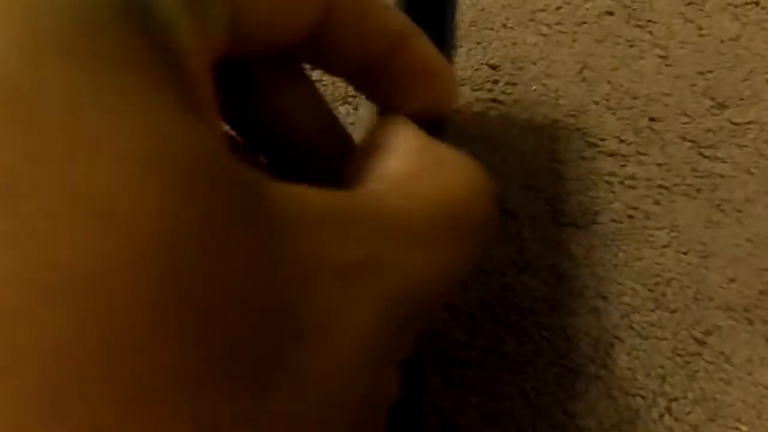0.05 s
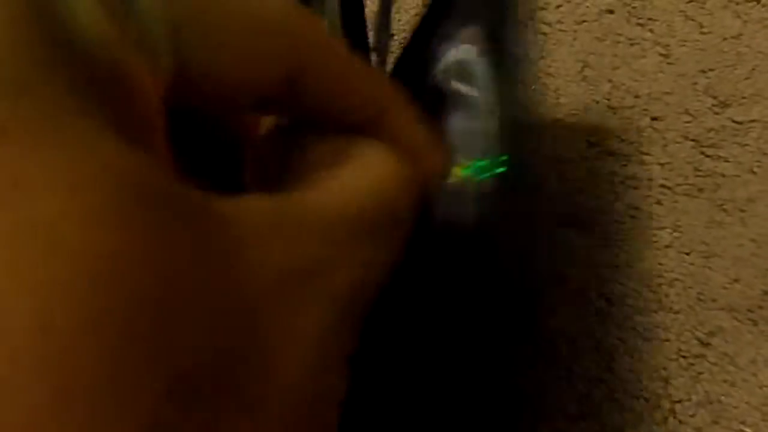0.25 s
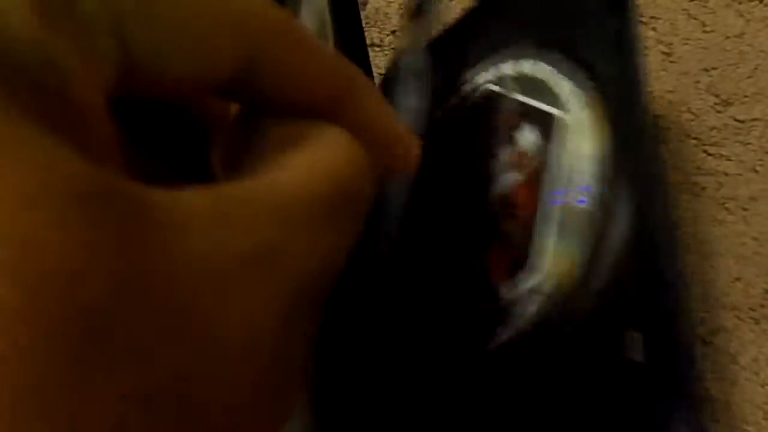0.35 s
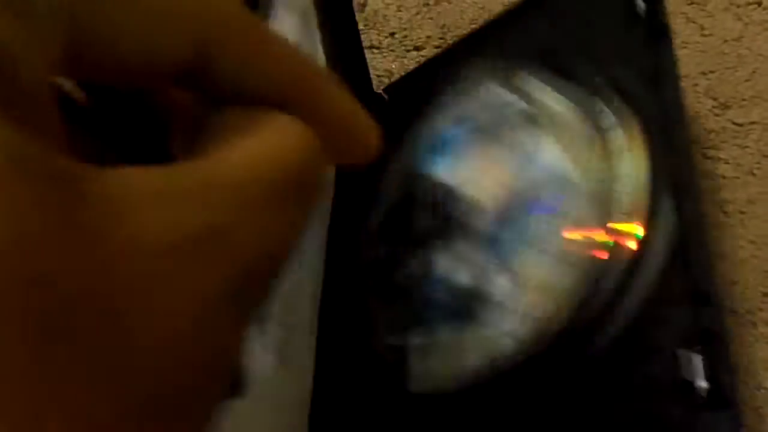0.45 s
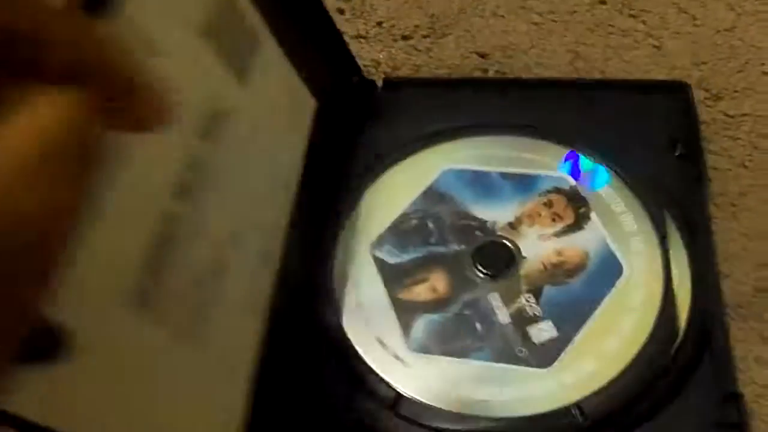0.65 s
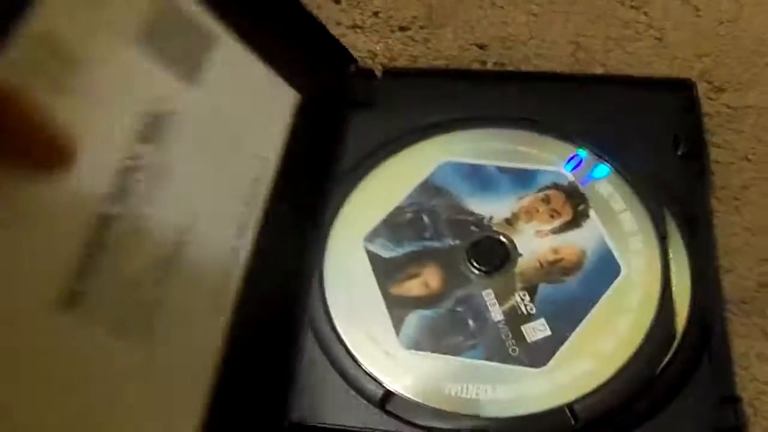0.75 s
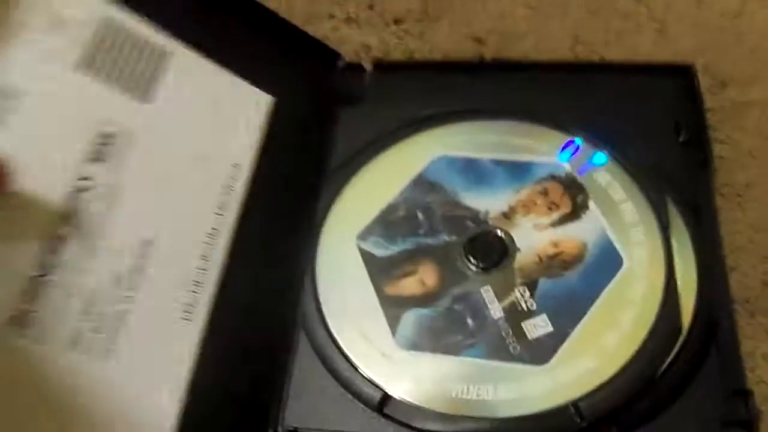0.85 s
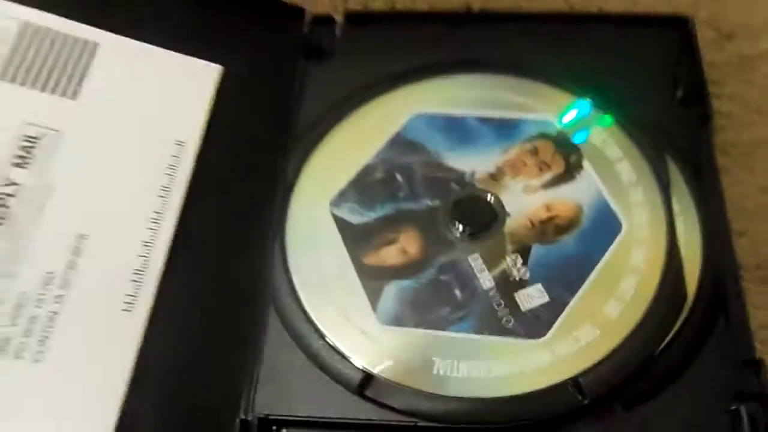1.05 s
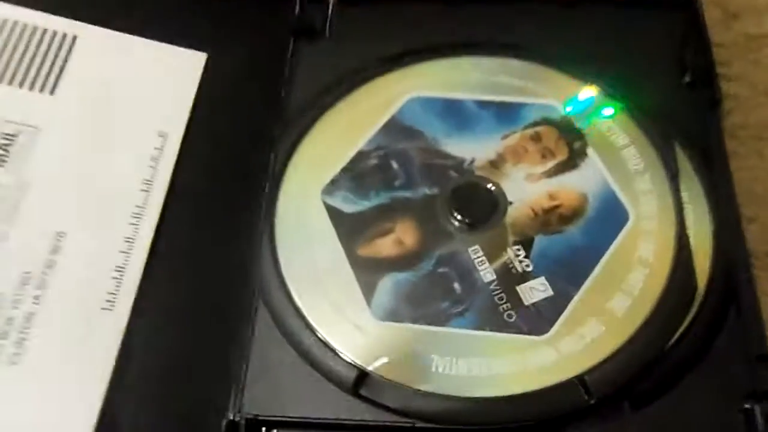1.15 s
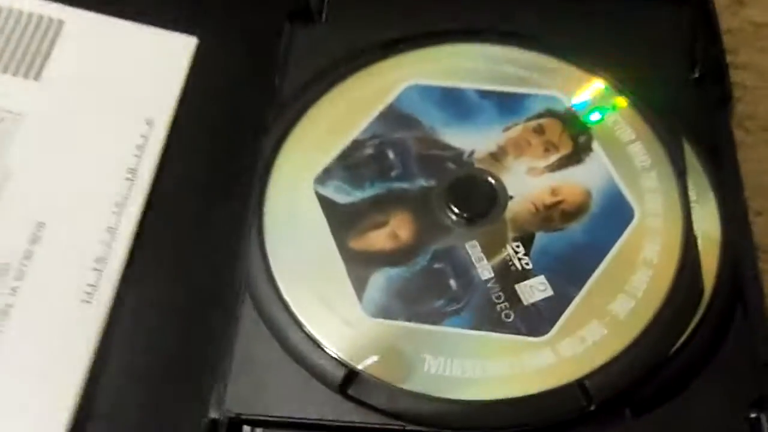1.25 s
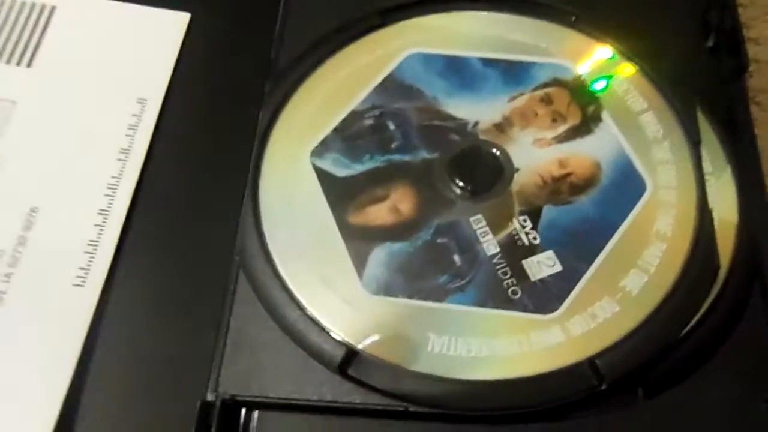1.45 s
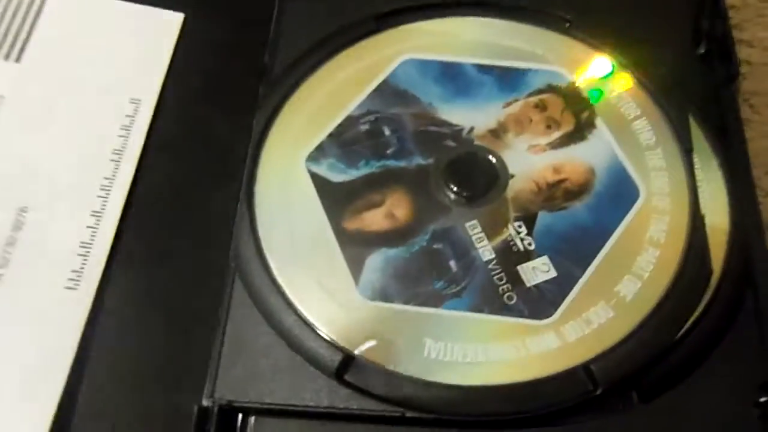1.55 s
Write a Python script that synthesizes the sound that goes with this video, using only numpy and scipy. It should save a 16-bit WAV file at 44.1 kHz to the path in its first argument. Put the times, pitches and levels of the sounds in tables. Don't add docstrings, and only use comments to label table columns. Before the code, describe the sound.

A plastic disc case snaps open close to a small microphone in a quiet carpeted room: two hard clicks in quick succession, a lighter tray slap with small bounces, faint settling ticks, then very soft paper crackle.

```python
import sys
import numpy as np
from scipy import signal
from scipy.fft import rfft, irfft
from scipy.io import wavfile
from scipy.ndimage import uniform_filter1d

SR = 44100
rng = np.random.default_rng(int(sys.argv[2]) if len(sys.argv) > 2 else 0)


def decibels_to_gain(level_db):
    exponent = np.asarray(level_db, float) / 20
    return 10 ** exponent


def transcribe(u):
    v = np.clip(np.atleast_2d(u).T, -1, 1)
    q = np.round(v * 32767).astype(np.int16)
    wavfile.write(sys.argv[1], SR, q)


N = 70560

# mode_hz, width_hz, level_db
LID_BODY = [(1037, 61.1, -11), (2170, 55, -12.5), (2720, 100, -14.5), (2890, 38.4, -6), (4000, 61, -6),
            (4670, 42, -10), (7160, 25, -4.5), (8900, 133, -10.5), (11110, 36, -16), (12000, 47, -20)]
# mode_hz, width_hz, level_db
SLEEVE_BODY = [(2050, 150, -5), (2900, 200, -8), (3450, 100, -7), (4350, 80, -4), (5400, 100, -8),
               (8000, 200, -10), (10000, 220, -10), (12800, 300, -12)]
# frequency_hz, density_db (per Hz)
TRAY_TONE = [(100, -34.5), (300, -23), (700, -24), (1300, -22.5), (2200, -12), (8000, -6.5), (13500, -15),
             (17000, -11)]
# frequency_hz, density_db (per Hz)
LID_TONE = [(180, -46), (300, -10.5), (1030, -12.5), (1300, -12.5), (2130, -8.5), (3870, -8.5),
            (14000, -29.5)]


def evened(x):
    return x / np.sqrt(np.mean(x ** 2) + 1e-20)


def read(points, hz):
    f, value = np.transpose(points)
    return np.interp(np.log(hz + 1), np.log(f + 1), value)


def curve(points):
    s, db = np.transpose(points)
    return decibels_to_gain(np.interp(np.arange(N) / SR, s, db))


def ring(x, hz, width):
    radius = np.exp(-np.pi * max(width, 20) / SR)
    pole = radius * np.exp(2j * np.pi * hz / SR)
    return 2 * signal.lfilter([1 - radius], [1, -pole], x).real


def colour(x, tone, tilt_db=0.):
    hz = np.abs(np.fft.fftfreq(2048, 1 / SR))
    octaves = np.log2(np.maximum(hz, 2000) / 4500)
    level_db = np.maximum(read(tone, hz) + tilt_db * octaves, -100)
    log_gain = np.log(decibels_to_gain(level_db))
    taps = np.fft.ifft(np.exp(np.conj(signal.hilbert(log_gain)))).real[:1024]
    return signal.fftconvolve(x, taps)[:len(x)]


def body(x, modes, tone, tilt_db, plain_db, shift=1):
    widen_hz = 120
    shifts = shift * np.ones(14)
    rung = 0
    for (hz, width, db), k in zip(modes, shifts):
        rung = rung + decibels_to_gain(db - read(tone, hz)) * ring(x, hz * k, width + widen_hz)
    return colour(evened(rung) + decibels_to_gain(plain_db) * evened(x), tone, tilt_db)


def knocks(rows, modes, tone, plain_db, ring_db):
    length, rise_s = 4096, .0006
    crack_s, crack_db = .002, 4.5
    shake_db, detune = 1, .015
    dull_hz, linger, linger_db = 4500, 2.76, -14.5
    ring_q = 8.0
    out, t = np.zeros(N + length), np.arange(length) / SR
    rise = np.minimum(t / rise_s, 1)
    crack = crack_db * np.exp(-(t / crack_s) ** 3)
    dull_filter = signal.butter(2, dull_hz, fs=SR)
    noises = rng.standard_normal((len(rows), 3, length))
    for (s, db, hz, t60, tilt_db), (fine, size, late) in zip(rows, noises):
        fall_db = -60 * t / max(t60, .003)
        contacts = fine * decibels_to_gain(shake_db * size + fall_db + crack)
        dull = evened(signal.lfilter(*dull_filter, late))
        drive = rise * (contacts + dull * decibels_to_gain(linger_db + fall_db / linger))
        sound = evened(body(drive, modes, tone, tilt_db, plain_db, 1 + detune * size[-14:]))
        sound = sound + decibels_to_gain(ring_db) * evened(ring(drive, hz, hz / ring_q))
        peak_rms = np.sqrt(uniform_filter1d(sound ** 2, size=66).max())
        at = round(s * SR)
        out[at:at + length] += decibels_to_gain(db - 6.5) * sound / peak_rms
    return out[:N]


def grains(effort, modes, tone, per_s, spread_db, plain_db, line):
    sizes = rng.standard_normal(N) * decibels_to_gain(spread_db * rng.exponential(1, N))
    slips = sizes * (rng.random(N) < per_s / SR)
    hz, width, line_db = line
    rubbed = evened(body(slips, modes, tone, 0., plain_db))
    return curve(effort) * (rubbed + decibels_to_gain(line_db) * evened(ring(slips, hz, width)))


def clasps():
    # start_s, peak_db, loudest_ring_hz, t60_s, tilt_db (per octave)
    snaps = [
        (.2463, -2, 6800, 0.017, 0),
        (.2553, -11, 5200, 0.0502, 0.5),
        (.2612, -3, 4270, 0.02, -1.5),
        (.2665, -8.5, 8700, 0.054, 3),
        (.2715, -8.5, 4500, 0.011, 3),
        (.2845, -18, 4900, 0.033, 0.5),
        (.2892, -14, 3275, 0.021, 1.2),
        (.3038, -15.5, 3270, 0.019, 3.5),
    ]
    # mode_hz, width_hz, level_db
    clasp_body = [(1107, 120, -8), (2050, 40, -18), (3120, 160, -1), (3750, 156.3, 0), (4600, 170, -4),
                  (5420, 120, -8), (5370, 31.9, -16.5), (6470, 300, -12), (8700, 170, -9.5),
                  (10200, 100, -12.5), (12500, 210, -4)]
    # frequency_hz, density_db (per Hz)
    clasp_tone = [(80, -35), (300, -28.5), (700, -13), (1500, -13), (2500, -9.5), (4400, -10), (6300, -8),
                  (13000, -12)]
    return knocks(snaps, clasp_body, clasp_tone, -1.4, -6.5)


def panel_modes():
    # start_s, level_db, mode_hz, t60_s
    struck_modes = [
        (0.2457, -17.5, 562, 0.016),
        (0.2466, -15.5, 2054, 0.024),
        (0.2608, -17.5, 476, 0.027),
        (0.2455, -36, 92, 0.12),
        (0.261, -33.5, 260, 0.031),
        (0.291, -44, 1080, 0.12),
        (0.43, -67, 115, 0.072),
        (0.516, -31.5, 1850, 0.05),
        (0.5155, -36.5, 1025, 0.035),
        (1.3, -58, 451, 0.027),
                    (.2464, -6.5, 3600, .015), (.2464, -6, 4915, .014), (.2466, -20.5, 1410, .026),
             (.2464, -13, 12800, 0.011), (.2609, -10.5, 3040, 0.0119), (.2611, -7.5, 4630, .011),
             (.2609, -17.5, 800, 0.013), (.2640, -25, 1250, 0.02), (.5059, -6, 6230, 0.0059),
             (.5056, -38, 912, 0.038), (.5056, -39.5, 423, 0.032), (.5160, -22.5, 3700, .012),
             (.5156, -25.5, 3060, 0.014), (.5150, -28, 1620, .025), (.5256, -30, 3700, .015),
             (.2467, -19, 9000, .01), (.3042, -24, 3200, .03)]
    # start_s, level_db, mode_hz, t60_s
    taps = [(.5676, -35, 1710, .015), (.5676, -38, 1150, .025), (.5735, -32, 3540, .02),
            (.5783, -30, 3120, .015), (.5972, -40, 2170, .02), (.6044, -35, 2860, .02),
            (.5782, -37, 2150, .02), (.6044, -39, 1800, .015), (.6817, -39, 3910, .012),
            (.6817, -41, 2100, .012), (.6923, -37, 2150, .018), (.6923, -41, 3900, .012),
            (.6989, -40, 3800, .012), (.6989, -45, 1050, .015), (.7028, -40, 4440, .012),
            (.6923, -43, 7100, .012), (.0694, -42, 1750, .012), (.0696, -49, 1000, .02),
            (.0993, -51, 1100, .025), (1.3672, -49, 1310, .014), (1.374, -50, 1750, .012)]
    length, rise_s = 8192, .0004
    out, t = np.zeros(N + length), np.arange(length) / SR
    rise = np.minimum(t / rise_s, 1)
    for s, db, hz, t60 in struck_modes + taps:
        at = round(s * SR)
        out[at:at + length] -= rise * decibels_to_gain(db - 60 * t / t60) * np.sin(2 * np.pi * hz * t)
    return out[:N]


def tray():
    # start_s, peak_db, loudest_ring_hz, t60_s, tilt_db (per octave)
    slaps = [(.5055, -10.5, 4700, 0.028, 5), (.5095, -16, 4330, 0.058, 2.5), (.5125, -18, 2870, .03, 6),
             (.5152, -14, 5500, 0.015, -1), (.5180, -27, 2900, 0.034, -2), (.5255, -34.5, 3700, 0.04, -5),
             (.537, -35.5, 2500, 0.025, -8.5), (.551, -33, 3280, 0.022, -1.5),
             (.558, -44, 3600, 0.034, -11), (.5675, -23, 7150, 0.043, -0.5), (.572, -29, 4400, 0.041, -6),
             (.578, -26, 3120, 0.029, -4.5), (.583, -29, 3850, 0.031, -8), (.589, -38, 2200, 0.04, -8),
             (.5968, -29.5, 11400, 0.031, 1.5), (.6042, -29, 4000, 0.021, -4), (.617, -43, 1970, 0.034, -2)]
    # mode_hz, width_hz, level_db
    tray_body = [(960, 30, -4.5), (1720, 50, 4), (2200, 24, -17), (2910, 290, 2), (3980, 130, 4.5),
                 (5100, 41.3, 0), (6100, 73, -8), (7070, 60, 0), (8430, 48, -6), (9400, 90, 1.5),
                 (11000, 110, -15)]
    return knocks(slaps, tray_body, TRAY_TONE, -1.2, -6.0)


def lid():
    # start_s, peak_db, loudest_ring_hz, t60_s, tilt_db (per octave)
    settling = [(.6535, -45, 4000, 0.05, -1), (.663, -48, 2490, 0.051, 14), (.6725, -44, 2460, 0.059, -15),
                (.6815, -35, 3910, 0.021, -4), (.686, -41.5, 2150, .02, 2), (.6922, -38.5, 2170, 0.012, 6),
                (.6988, -34, 3700, 0.029, -4.5), (.7025, -42, 4440, 0.021, 0), (.7105, -40, 2050, .026, 2),
                (.7145, -52, 2574, 0.018, -5), (.7215, -50, 3710, 0.045, 14), (.732, -53, 2980, 0.067, 4)]
    return knocks(settling, LID_BODY, LID_TONE, -1.0, -3.0)


def hinge():
    # time_s, level_db
    rub = [(0.6, -85), (0.65, -59), (0.7, -49), (0.738, -58), (0.76, -81)]
    return grains(rub, LID_BODY, LID_TONE, 4000.0, 1.8, 4, (2170, 150, -14))


def grip():
    # start_s, peak_db, loudest_ring_hz, t60_s, tilt_db (per octave)
    ticks = [
        (.0694, -46.5, 2800, 0.008, 1.5),
        (.0995, -51, 1650, 0.04, -6),
        (.193, -51, 1960, 0.04, -3.5),
        (.225, -48, 1820, 0.037, -4),
        (.387, -47.5, 3140, 0.037, -5.4),
        (.4535, -49.5, 9800, .025, -1),
        (.464, -51, 3250, .03, -4),
    ]
    return knocks(ticks, LID_BODY, TRAY_TONE, 2.6, 0.27)


def sleeve():
    # start_s, peak_db, loudest_ring_hz, t60_s, tilt_db (per octave)
    crackles = [(1.304, -54, 10000, .01, 4), (1.3507, -44, 4170, .01, .6), (1.3532, -43, 4250, .01, 2),
                (1.3672, -50, 2300, .01, -2), (1.374, -47, 4400, .008, -2), (1.3895, -51, 4410, .015, 0),
                (1.394, -52, 8000, .02, 3), (1.399, -53, 5400, .015, 2), (1.408, -52, 2050, .02, 1),
                (1.4125, -49, 4310, .03, 2), (1.438, -55, 8000, .012, 0)]
    return knocks(crackles, SLEEVE_BODY, TRAY_TONE, -1.5, 3.5)


def crinkle():
    # time_s, level_db
    bending = [(1.345, -98.5), (1.357, -63), (1.378, -65), (1.392, -59.5), (1.42, -63), (1.45, -69),
               (1.5, -92)]
    # mode_hz, width_hz, level_db
    sleeve_ring = (4310, 300, -11)
    return grains(bending, SLEEVE_BODY, TRAY_TONE, 9000., 1.2, -2.5, sleeve_ring)


def room(x):
    # frequency_hz, t60_s
    decay = [(150, 0.21), (500, 0.21), (1500, 0.22), (4000, 0.18), (12000, 0.12)]
    taps, at = np.zeros(SR // 2), np.arange(200, SR // 2 - 20, 20)
    taps[at + rng.integers(0, 20, at.shape)] = rng.choice([-1., 1.], at.shape)
    hz, t, z = signal.stft(taps, SR, nperseg=256)
    fall = decibels_to_gain(-60 * t / read(decay, hz)[:, None])
    tail = signal.istft(z * fall, SR, nperseg=256)[1]
    tail = signal.lfilter(*signal.butter(1, 7010, fs=SR), tail)
    return signal.fftconvolve(x, tail / np.linalg.norm(tail))[:N]


def hiss():
    # frequency_hz, density_db (per Hz)
    spectrum = [(12, -30), (20, -1.5), (176, -8), (214, -10.5), (361, -13), (546, -12.5), (825, -15),
                (12300, -25.5), (14500, -25)]
    # time_s, level_db
    drift = [(0, -57.5), (0.22, -58), (0.45, -59.5), (0.75, -62), (0.85, -63), (1.2, -62.5), (1.6, -62)]
    z = rfft(rng.standard_normal(N)) * decibels_to_gain(read(spectrum, np.fft.rfftfreq(N, 1 / SR)))
    return curve(drift) * evened(irfft(z, N))


def scene():
    case = clasps() + panel_modes() + tray() + lid() + hinge() + grip() + sleeve() + crinkle()
    room_db = -22.5
    return (case + decibels_to_gain(room_db) * room(case) + hiss())[None]


def low_pass(x):
    return signal.sosfilt(signal.butter(12, 15220, fs=SR, output="sos"), x)


def record(dry):
    clip, edge_hz, edge_db = .75, 14150, -33
    soft = clip * np.tanh(dry / clip)
    lowpass = signal.firwin(255, edge_hz, window=("kaiser", 7), fs=SR)
    low = signal.oaconvolve(soft, lowpass[None], "same")
    return low_pass(low + decibels_to_gain(edge_db) * (soft - low))


dry = scene()
out = record(dry)
transcribe(out)
```